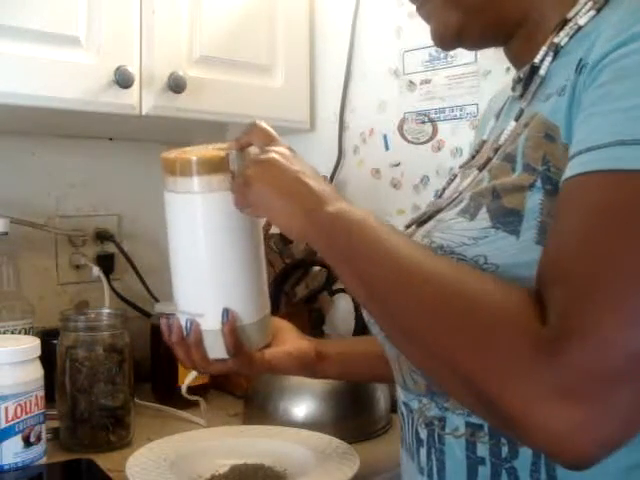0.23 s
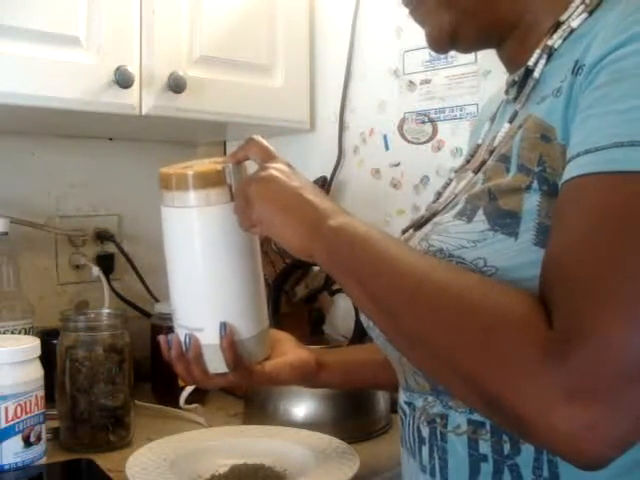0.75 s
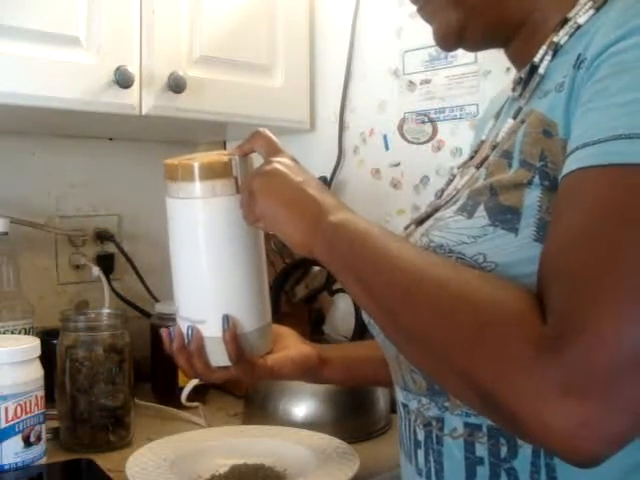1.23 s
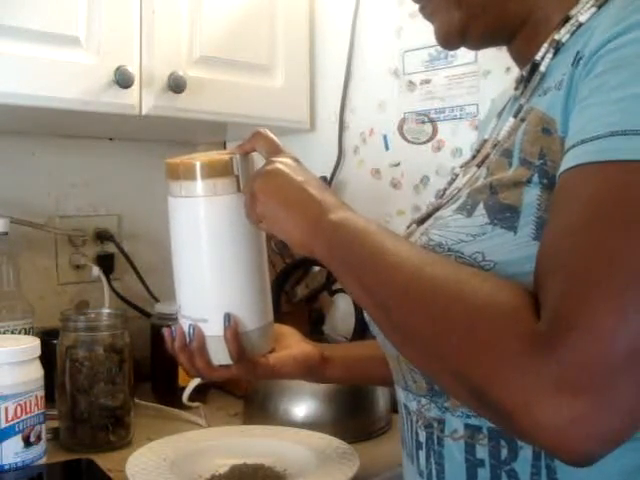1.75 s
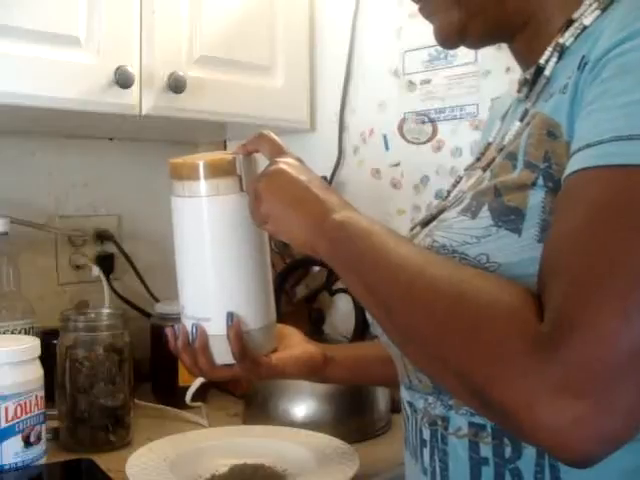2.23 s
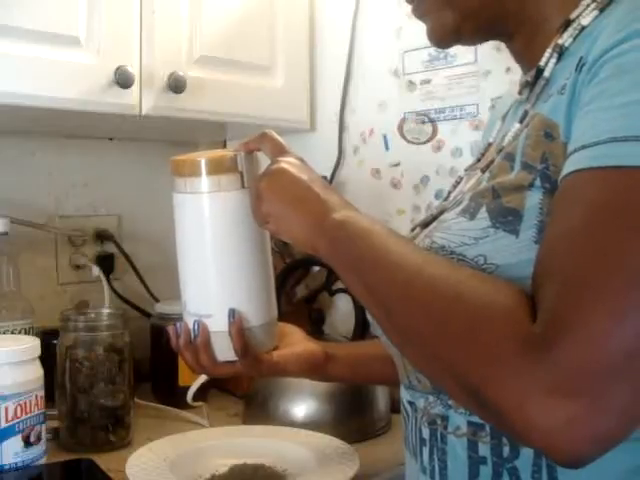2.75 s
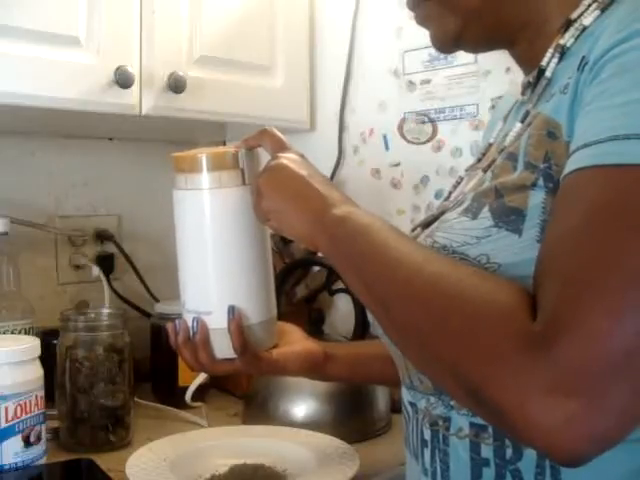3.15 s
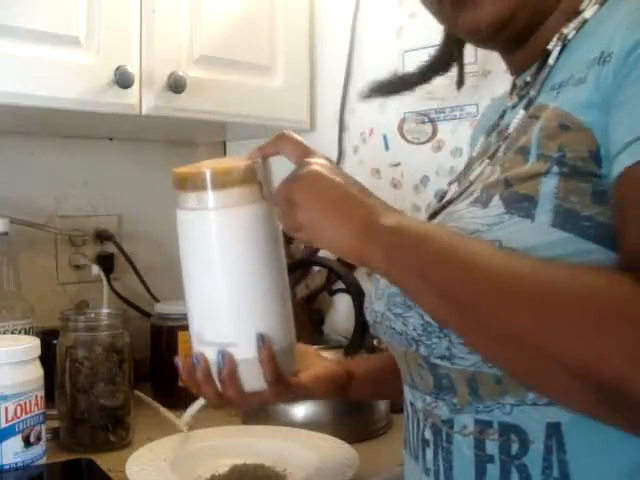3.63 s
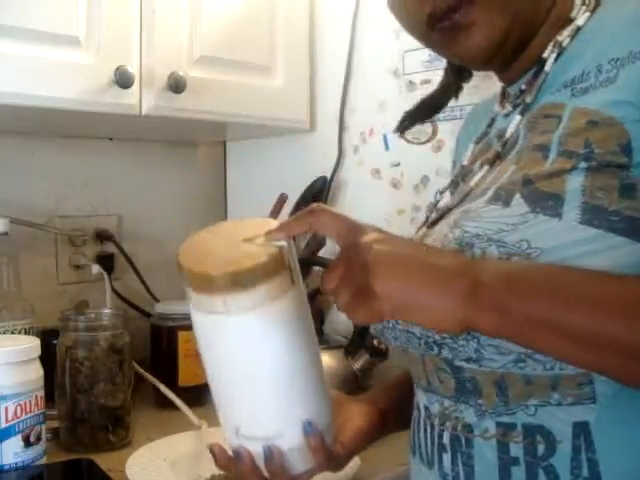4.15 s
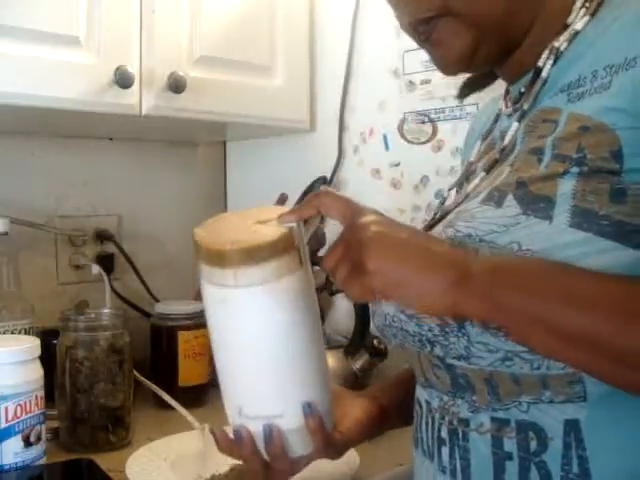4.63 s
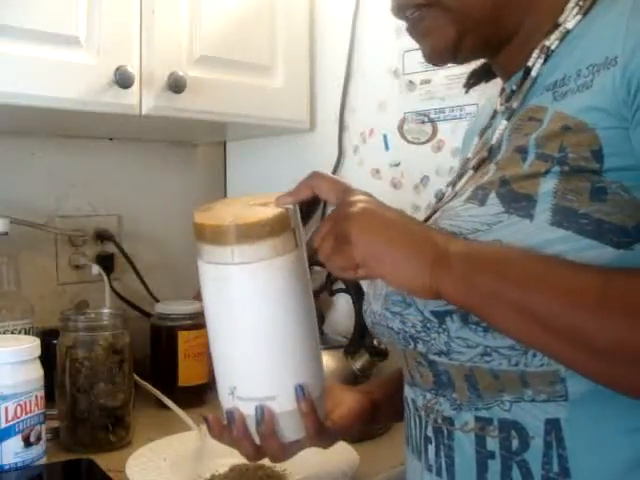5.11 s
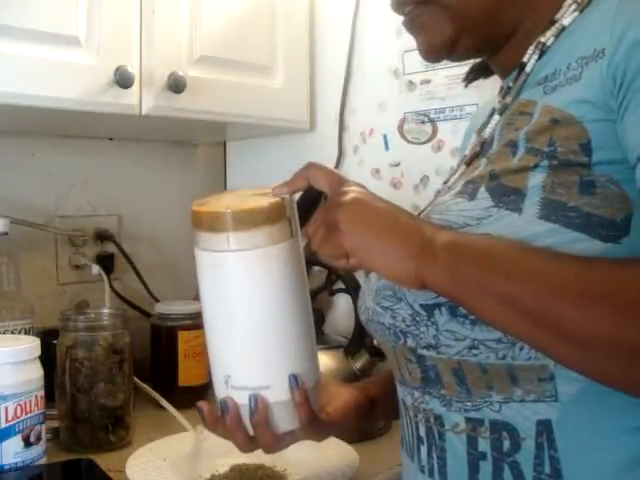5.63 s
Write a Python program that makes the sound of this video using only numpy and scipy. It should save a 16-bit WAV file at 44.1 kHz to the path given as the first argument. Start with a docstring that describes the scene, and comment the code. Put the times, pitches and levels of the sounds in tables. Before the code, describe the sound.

In a small kitchen, a handheld electric blade grinder runs close to the microphone. A high, buzzing motor whine sits over rushing powder and bright grit rattling in a steel cup. It climbs slightly at first and holds steady, then the button is released for a third of a second. The pitch drops, coarse bits clatter, and the motor spins back up as the grinder is tipped, running on to the end.

```python
"""Small kitchen, close by, mono: a hand-held electric blade grinder mills dry grit.
The motor whines on multiples of the shaft speed and buzzes with the mains (modulated sine tones).
Grit rattles in the steel cup (random blows through cup modes); air and powder swirl (shaped noise).
Past the middle the motor coasts for a moment, the grinder is tipped, and it speeds up again."""
import sys
import numpy as np
from scipy import signal
from scipy.fft import rfft, irfft, next_fast_len
from scipy.io import wavfile
from scipy.ndimage import uniform_filter1d, map_coordinates

SR = 44100
rng = np.random.default_rng(int(sys.argv[2]) if len(sys.argv) > 2 else 0)


def dump_mix(stems):
    """Bounce the given channels to the path in sys.argv[1] as a 16-bit WAV at rate SR."""
    frames = np.atleast_2d(stems).T  # one column per channel
    limited = np.clip(frames, -1, 1)  # hard clip at full scale
    pcm = np.round(limited * 32767).astype(np.int16)
    wavfile.write(sys.argv[1], SR, pcm)


N = 259066

FULL_HZ = 350  # reference shaft speed for level slopes
OFF_S, ON_S = 3.59, 3.92  # button let go, pressed again
BITE_HZ, BITE_WIDTH_HZ = 331.2, 14.8  # shaft speed of deepest bite into the grit
# how the grinder is held: (time [s], tipped [0-1])
TILT = [(0, 0.4), (.55, 0.74), (1, 0.09), (3.55, 0.18), (4.03, 1), (5.87, 1)]


def amp(db):
    """Decibels to gain."""
    return 10 ** (np.asarray(db) / 20)


def unit(x):
    """Scaled to rms 1."""
    return x / np.sqrt(np.mean(x ** 2) + 1e-20)


def along(points, hz):
    """(Hz, value) points read on a log frequency axis."""
    f, v = np.transpose(points)
    return np.interp(np.log(hz + 1), np.log(f + 1), v)


def curves(rows):
    """One value per sample for each column after the time."""
    s, *cols = np.transpose(rows)
    return [np.interp(np.arange(N) / SR, s, c) for c in cols]


def bump(x, centre, width):
    """Bell of height 1, down to 1/e at one width from the centre."""
    return np.exp(-((x - centre) / width) ** 2)


def wobble(rate):
    """Smooth random curve, rate knots a second."""
    knots = rng.standard_normal(int(N * rate / SR) + 4)
    coarse = np.arange(0, N, 16)
    return np.interp(np.arange(N), coarse, map_coordinates(knots, [coarse * rate / SR]))


def spurts(per_s, decay_s):
    """Random curve of mean 0 and rms 1 that jumps up and sinks back."""
    kicks = 1. * (rng.random(N) < per_s / SR)
    decay = np.exp(-1 / (decay_s * SR))
    return unit(signal.lfilter([1], [1, -decay], kicks - kicks.mean()))


def filtered(x, response):
    """x times a complex response of frequency."""
    m = next_fast_len(N + SR // 2)
    return irfft(rfft(x, m) * response(np.fft.rfftfreq(m, 1 / SR)), m)[:N]


def resonance(f, hz, width):
    """Response of one damped mode, 1 at its centre."""
    return 1j * f * width / (hz * hz - f * f + 1j * f * width)


def surging():
    """The blade clears a hollow and runs free: 1 at the top of a surge, 0 between surges."""
    # (time [s], bell width [s])
    surge_times = [(2.961, 0.0526), (3.25, 0.0545), (3.515, 0.0352)]
    return sum(bump(np.arange(N) / SR, s, width) for s, width in surge_times)


def powered():
    """1 while the button is pressed, 0 while the motor coasts, with 50 ms ramps."""
    t = np.arange(N) / SR
    return uniform_filter1d(1. * ((t < OFF_S) | (t > ON_S)), size=SR // 20)


def shaft_speed():
    """Speed [Hz] held against the load; falls steadily without power, then recovers, fast at first."""
    # (time [s], shaft speed [Hz])
    cruise = [(0.0, 327.84), (0.35, 336.9), (0.92, 348.9), (1.3, 350), (1.9, 349.26), (2.22, 347.7),
              (2.6, 352.2), (3.1, 351), (3.42, 349.5), (3.58, 349.2), (4.3, 350.9), (4.6, 352.5),
              (4.82, 354.52), (5.0, 358), (5.45, 357.6), (5.87, 361.5)]
    coast_hz_per_s, spin_up_s, surge_hz = 367, .246, 2.8  # spin_up_s: time constant
    t = np.arange(N) / SR
    coasted_s = np.clip(t - OFF_S, 0, ON_S - OFF_S)
    recovery = np.exp(-np.maximum(t - ON_S, 0) / spin_up_s)
    return curves(cruise)[0] + surge_hz * surging() - coast_hz_per_s * coasted_s * recovery


def shaft_angle(speed, unsteady_hz):
    """The shaft's angle [rad]; the load tugs at its speed."""
    return 2 * np.pi * np.cumsum(speed + unsteady_hz * wobble(35)) / SR


def tumbling(speed):
    """1 while the blade is too slow to hold coarse bits against the wall."""
    threshold_hz, width_hz = 345, 1.1
    return .5 + .5 * np.tanh((threshold_hz - speed) / width_hz)


def dips_and_swells():
    """Brief dips and swells: dB added to the churn and to the rattle."""
    # (time [s], bell width [s], churn change [dB], rattle change [dB])
    level_shifts = [(0.316, 0.018, -1, -9), (0.357, .015, 2.5, 3), (0.457, 0.02, 1, -2),
                    (2.997, 0.025, 5.5, 3), (3.11, 0.03, -4, -2), (3.466, 0.027, -7.5, -6.5),
                    (3.57, 0.028, 4.5, 0), (3.71, 0.041, -10, -3), (3.807, 0.056, 3.5, 3),
                    (3.896, 0.018, -2.5, -2), (3.948, 0.017, 0, 4), (3.98, 0.012, -6, 0),
                    (4.759, .015, 5.5, 2.5), (4.91, 0.043, 1, -4.5), (5.181, .02, -0.5, -9),
                    (5.4, 0.034, 1.5, 2)]
    t = np.arange(N) / SR
    return sum(np.outer(dbs, bump(t, s, width)) for s, width, *dbs in level_shifts)


def partial(angle, flutter):
    """One tone, rms 1 before the grit shakes its amplitude and phase."""
    shake = flutter * (wobble(30) + 1j * wobble(30) + .5 * wobble(160))
    phase = rng.uniform(0, 2 * np.pi)
    return np.sqrt(2) * np.real((1 + shake) * np.exp(1j * (angle + phase)))


def whine(angle, speed, strong_db, flutter, tumble_flutter, slow_flutter, lurch_db, sway_db, coast_freedom):
    """Imbalance and blade passes give the low orders: louder with speed, rougher slow, swaying tipped."""
    # multiples of the shaft speed
    strong_orders = (1, 2, 3, 4, 6)
    # row per order: (relative level at full speed [dB], slope [dB/octave of speed],
    # change when tipped [dB], change while the blade runs free [dB])
    tones = [(-28.5, 11, -1.9, 0), (-43.5, 6.5, -2, 4), (-27.5, 33, -0.4, -2), (-24.5, 24, -2, -7.5),
             (-36, 24, 3, -2)]
    # narrow peaks and nulls between grinder and walls, swept by the tones:
    # (centre [Hz], bell width [Hz], gain [dB], shift when tipped [Hz])
    standing_waves = [(255.2, 7.6, -13, 1.5), (291, 8.4, -1.5, -5), (348, 6.9, -15, -3.5),
                      (667.6, 10, 10, -9.5), (710.4, 7.7, 4.5, 12.5), (1026, 14.4, 5, 1.5),
                      (1054.4, 5.6, 4, 16), (1253, 47, -9.5, -2.5), (1270, 11, -1, 2), (1356, 11, -5, 6.5),
                      (1401, 94, 9, 29.5), (1418.6, 7, -6.5, 5), (2067.3, 21, -12.5, -6),
                      (2091.6, 33, 12, 4)]
    tipped, = curves(TILT)
    free = surging() + coast_freedom * (1 - powered())
    octaves = np.log2(speed / FULL_HZ)
    slow = 1 - speed / speed.max()
    out = np.zeros(N)
    for order, (db, db_per_octave, tipped_db, free_db) in zip(strong_orders, tones):
        drive_db = db + db_per_octave * octaves + tipped_db * tipped + free_db * free
        wave_db = sum(gain_db * bump(order * speed, hz + shift_hz * tipped, width)
                      for hz, width, gain_db, shift_hz in standing_waves)
        chance_db = lurch_db * np.sqrt(np.maximum(-octaves, 0)) * wobble(24.87)
        chance_db += sway_db * tipped * wobble(9)
        roughness = flutter + tumble_flutter * order * tumbling(speed) + slow_flutter * slow
        level_db = strong_db + drive_db + wave_db + chance_db
        out += amp(level_db) * partial(order * angle, roughness)
    return out


def overtones(angle, speed, level_db, bite_db, flutter, slow_fade_db, lurch_db):
    """Weaker orders flare as they cross the housing's resonances; a slow blade loses the high ones."""
    # multiples of the shaft speed
    weak_orders = (5, 7, 8, 9, 10, 11, 12, 13, 14, 15)
    # housing response: (frequency [Hz], relative level upright [dB], relative level tipped [dB])
    housing = [(1410, -59, -36), (1716, -27.5, -31.5), (1797, -42, -32.5), (1988, -47, -48),
               (2137, -28, -22), (2161, -38, -39), (2306, -48.5, -48), (2513, -33.5, -32.5),
               (2670, -41.5, -34), (2900, -32, -43), (2980, -45, -42), (3127, -40.5, -29.5),
               (3260, -33, -41.5), (3330, -32, -48), (3574, -28.5, -37), (3580, -47, -42.5),
               (3800, -57, -53), (3954, -57.5, -33), (4020, -43, -47), (4340, -38.5, -35),
               (4380, -51.5, -50), (5300, -44.5, -54)]
    tipped, = curves(TILT)
    hz, upright_db, tipped_db = np.transpose(housing)
    slow = 1 - speed / speed.max()
    out = np.zeros(N)
    for order in weak_orders:
        body_db = (1 - tipped) * np.interp(order * speed, hz, upright_db)
        body_db += tipped * np.interp(order * speed, hz, tipped_db)
        slow_db = slow * (lurch_db * wobble(25) - slow_fade_db * order)
        out += amp(body_db + slow_db) * partial(order * angle, flutter)
    return amp(level_db + bite_db * bump(speed, BITE_HZ, BITE_WIDTH_HZ)) * out


def loose_rotor(angle, level_db, flutter, peak_s):
    """As power goes the rotor chatters in its bearings: a cluster of rough overtones flares and dies."""
    # multiples of the shaft speed
    loose_orders = (5, 6, 7, 8)
    age = np.maximum(np.arange(N) / SR - OFF_S, 0) / peak_s
    flare = (age * np.exp(1 - age)) ** 2
    return amp(level_db) * flare * sum(partial(order * angle, flutter) for order in loose_orders)


def buzz(angle, speed, level_db, db_per_octave, tipped_db, waver_db, count):
    """Torque pulses with each mains half cycle: a side tone above and below each shaft order."""
    # (side tone frequency [Hz], relative level [dB])
    side_levels = [(230, -56.5), (470, -64), (590, -52), (720, -58.5), (820, -47), (950, -47.5),
                   (1280, -41), (1550, -46), (1670, -42), (2000, -39.5), (2280, -46), (2700, -46.5),
                   (3600, -47), (4500, -53)]
    ripple_hz = 120
    ripple = 2 * np.pi * ripple_hz * np.arange(N) / SR
    out = np.zeros(N)
    for order in range(1, count + 1):
        for side in (-1, 1):
            db = along(side_levels, order * speed + side * ripple_hz) + waver_db * wobble(8)
            phase = rng.uniform(0, 2 * np.pi)
            out += amp(db) * np.cos(order * angle + side * ripple + phase)
    drive_db = level_db + db_per_octave * np.log2(speed / FULL_HZ) + tipped_db * curves(TILT)[0]
    return np.sqrt(2) * powered() * amp(drive_db) * out


def cup(blows):
    """The steel cup answers a blow with a broad crack and a few ringing modes."""
    # wall response: (frequency [Hz], relative level [dB])
    wall = [(300, -32), (1200, -27), (2500, -36), (4000, -2.5), (4900, 6), (5800, 4.5), (6400, 8),
            (7000, 7), (7450, 1.5), (7850, 6.5), (8300, -3.5), (9200, -3), (10000, -18)]
    # (centre [Hz], width [Hz], relative level [dB])
    cup_modes = [(4850, 40, -2.5), (5360, 55, 2), (6310, 140, 1.5), (7530, 39, -12.5), (8800, 164, 2.5),
                 (9657, 124, 8)]

    def response(f):
        ring = sum(amp(db) * resonance(f, hz, width) for hz, width, db in cup_modes)
        return amp(along(wall, f)) * 1.08 + ring
    return filtered(blows, response)


def rattle(angle, speed, shift_db, level_db, bite_db, tipped_db, grains_per_s, clump_db, shared_db, pulsing):
    """Thousands of grains are flung at the wall, each grain size in clumps of its own."""
    # centres of the ranges that grains of different size excite: [Hz]
    wall_zones = [3000, 5700, 6800, 9150]
    rattle_db = shift_db + bite_db * bump(speed, BITE_HZ, BITE_WIDTH_HZ) + tipped_db * curves(TILT)[0]
    blows = np.zeros(N)
    for share in np.eye(len(wall_zones)):
        # grains_per_s is per size
        hits = rng.random(N) < grains_per_s / SR * (1 + pulsing * np.cos(angle))
        clumps = amp(clump_db * unit(wobble(60) + 6.6 * wobble(170)))
        grains = hits * rng.standard_normal(N) * clumps
        blows += filtered(grains, lambda hz: np.sqrt(np.interp(hz, wall_zones, share)))
    blows *= amp(shared_db * spurts(per_s=110, decay_s=0.0088))
    return amp(rattle_db + level_db) * unit(cup(blows))


def knocks(level_db, t60):
    """A coarse bit strikes the cup and shatters: a decaying noise burst into the cup."""
    # (time [s], relative level [dB])
    strikes = [(0.35, -16), (0.533, -13), (1.4746, -9.5), (2.2677, -9.5), (3.1925, -8), (3.269, -5),
               (3.9247, -15.5), (4.047, -8.5), (4.1096, -4.5), (4.2025, -7), (4.26, -11), (4.433, -9.5),
               (4.5695, -12)]
    t = np.arange(SR // 20) / SR
    blows = np.zeros(N + SR)
    for s, db in strikes:
        burst = amp(db + level_db - 60 * t / t60) * rng.standard_normal(len(t))
        blows[round(s * SR):][:len(t)] += burst
    return cup(blows[:N])


def tumble(speed, bits_per_s):
    """While the blade is slow, coarse bits drum on the plastic lid; random blows ring its modes."""
    # (centre [Hz], width [Hz], base level [dB], change while bits tumble [dB], change when tipped [dB])
    lid_modes = [(1390, 320, -41.5, 5, 2), (1386, 120, -43.5, 20.5, -14.5), (3670, 980, -47.5, 7, 8.5)]
    tipped, = curves(TILT)
    out = np.zeros(N)
    for hz, width, db, tumble_db, tipped_db in lid_modes:
        blows = (rng.random(N) < bits_per_s / SR) * rng.standard_normal(N)
        drumming = unit(filtered(blows, lambda f: resonance(f, hz, width) ** 2))
        out += amp(db + tumble_db * tumbling(speed) + tipped_db * tipped) * drumming
    return out


def catches(level_db):
    """The blade catches a lump and the body rasps: resonant noise under a short bell."""
    # (time [s], ringing [Hz], width [Hz], length [s], relative level [dB])
    lumps = [(0.353, 1370, 393, 0.016, -23.5), (3.789, 1280, 220, 0.014, -19.5),
             (3.829, 1290, 297.8, .02, -24.5), (4.057, 3500, 694, .008, -22), (4.071, 3650, 704, .007, -27)]
    t = np.arange(N) / SR
    out = np.zeros(N)
    for s, hz, width, length, db in lumps:
        rasp = unit(filtered(rng.standard_normal(N), lambda f: resonance(f, hz, width) ** 2))
        out += amp(db + level_db) * np.exp(-2 * ((t - s) / length) ** 2) * rasp
    return out


def churn(angle, speed, shift_db, level_db, db_per_octave, bite_db, tipped_db, pulsing):
    """The blade stirs air and powder, in a puff on each turn, harder the faster it runs."""
    # (frequency [Hz], relative density [dB per Hz])
    swirl_spectrum = [(25, -31), (45, -30.5), (90, -23.5), (180, -16), (240, -10), (330, -10), (500, -13),
                      (620, -7), (800, -14), (980, -1), (1250, 4), (1600, -2), (2100, 5), (3000, -1.5),
                      (4100, -0.5), (5500, -16.5), (10000, -47)]
    churn_db = shift_db + db_per_octave * np.log2(speed / FULL_HZ)
    churn_db += bite_db * bump(speed, BITE_HZ, BITE_WIDTH_HZ) + tipped_db * curves(TILT)[0]
    puffs = rng.standard_normal(N) * (1 + pulsing * np.cos(angle)) * amp(2.4 * wobble(90))
    swirl = unit(filtered(puffs, lambda hz: amp(along(swirl_spectrum, hz))))
    return amp(churn_db + level_db) * swirl


def handling(corner_hz):
    """Faint rumble of low-passed noise as the grinder is shifted in the hands."""
    # (time [s], level [dB])
    rumble_levels = [(0, -71), (3.4, -80), (3.9, -62), (4.3, -57), (4.4, -52), (4.48, -61), (5.87, -63)]
    db, = curves(rumble_levels)
    rumble = filtered(rng.standard_normal(N), lambda hz: 1 / (1 + (hz / corner_hz) ** 2))
    return amp(db) * unit(rumble)


def kitchen(x):
    """Cupboards and walls answer with a short tail of decaying noise, 4 ms late."""
    # (frequency [Hz], t60 [s])
    decay_times = [(200, 0.4), (2000, 0.11), (10000, 0.077)]
    hz, t, z = signal.stft(rng.standard_normal(SR // 2), SR, nperseg=256)
    decay = amp(-60 * t / along(decay_times, hz)[:, None])
    tail = signal.istft(z * decay, SR, nperseg=256)[1]
    return signal.fftconvolve(np.pad(x, (SR // 250, 0)), tail / np.linalg.norm(tail))[:N]


def scene():
    """Motor, swirl and grit all follow the shaft's speed, alike in both channels."""
    speed = shaft_speed()
    angle = shaft_angle(speed, unsteady_hz=0.451)
    churn_shift_db, rattle_shift_db = dips_and_swells()
    motor = whine(angle, speed, strong_db=-0.23, flutter=0.11, tumble_flutter=0.014, slow_flutter=0.92,
                  lurch_db=4.5, sway_db=0.4, coast_freedom=1.0)
    motor += overtones(angle, speed, level_db=0.16, bite_db=2.5, flutter=0.21, slow_fade_db=3.0,
                       lurch_db=14.5)
    motor += loose_rotor(angle, level_db=-35.5, flutter=1.0, peak_s=0.059)
    motor += buzz(angle, speed, level_db=-0.5, db_per_octave=8.5, tipped_db=-0.8, waver_db=3.5, count=12)
    grit = rattle(angle, speed, rattle_shift_db, level_db=-26, bite_db=3.0, tipped_db=0.94,
                  grains_per_s=20000, clump_db=2.0, shared_db=1.5, pulsing=0.22)
    grit += knocks(level_db=-11.0, t60=0.06)
    grit += tumble(speed, bits_per_s=900)
    grit += catches(level_db=3.5)
    swirl = churn(angle, speed, churn_shift_db, level_db=-28.5, db_per_octave=2.5, bite_db=4,
                  tipped_db=-1.0, pulsing=0.14)
    mono = motor + grit + swirl + handling(corner_hz=110) + amp(-18.0) * kitchen(grit)
    return np.array([mono, mono])


def record(dry):
    """The recorder keeps nothing above its band limit."""
    top_hz = 10100
    return np.array([filtered(channel, lambda hz: hz < top_hz) for channel in dry])


dry = scene()
out = record(dry)
dump_mix(out)
```